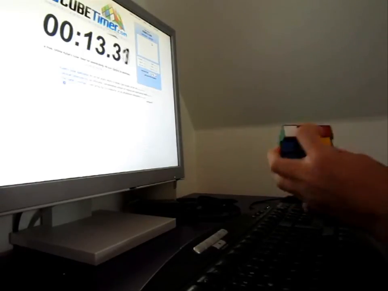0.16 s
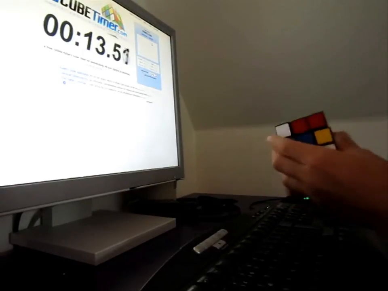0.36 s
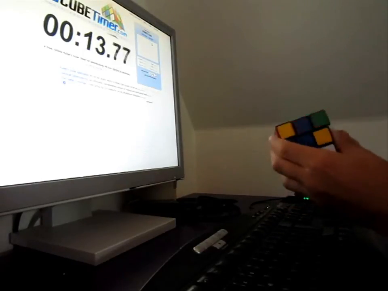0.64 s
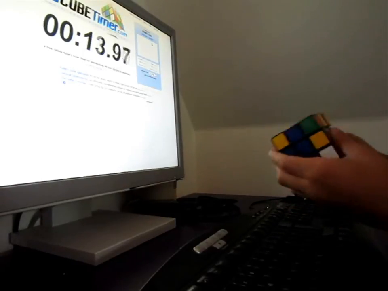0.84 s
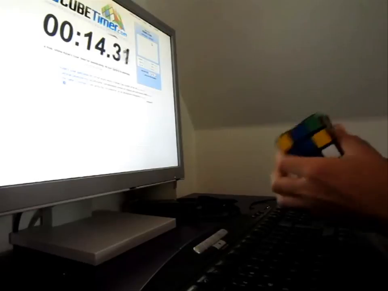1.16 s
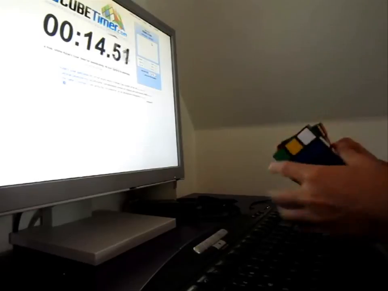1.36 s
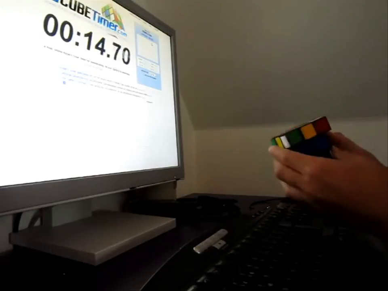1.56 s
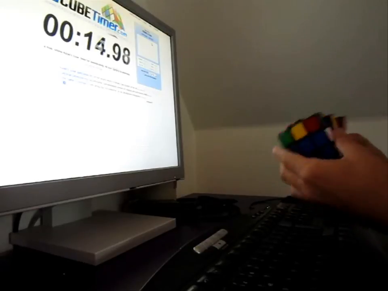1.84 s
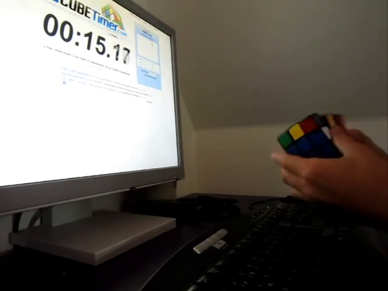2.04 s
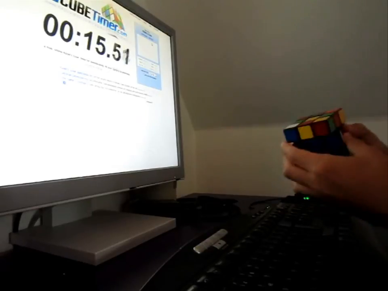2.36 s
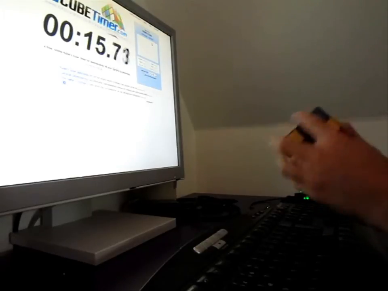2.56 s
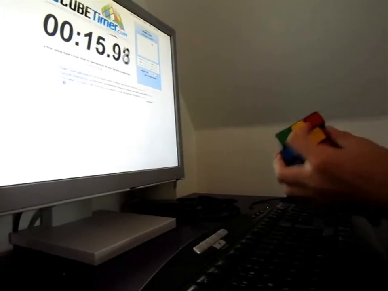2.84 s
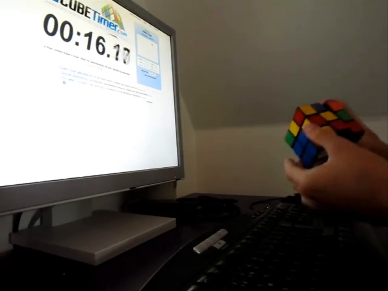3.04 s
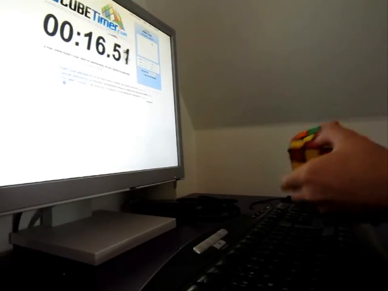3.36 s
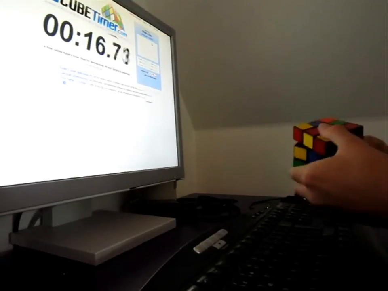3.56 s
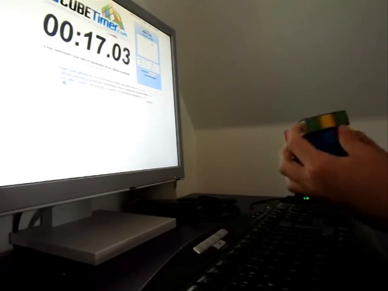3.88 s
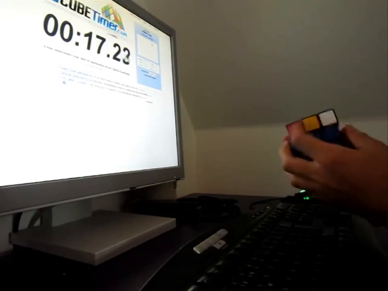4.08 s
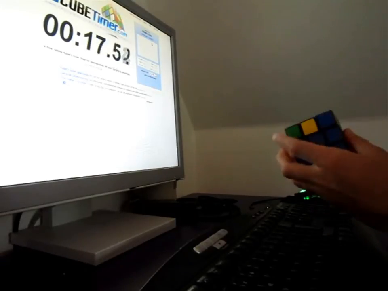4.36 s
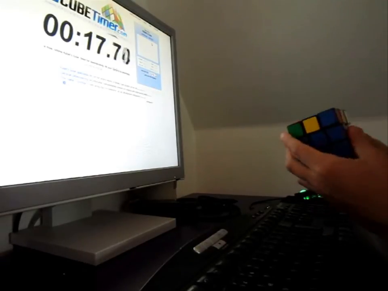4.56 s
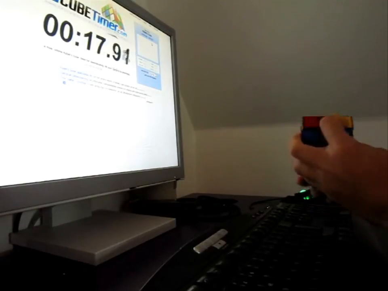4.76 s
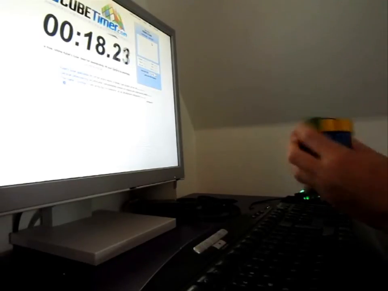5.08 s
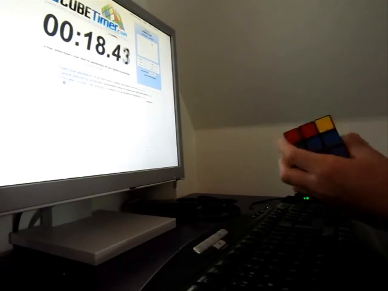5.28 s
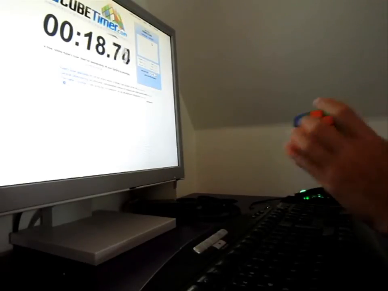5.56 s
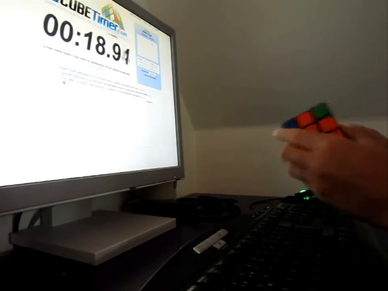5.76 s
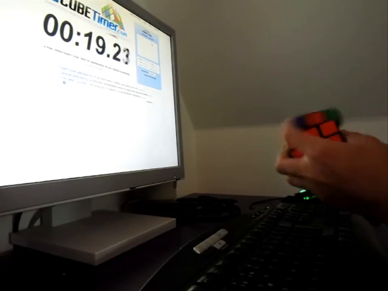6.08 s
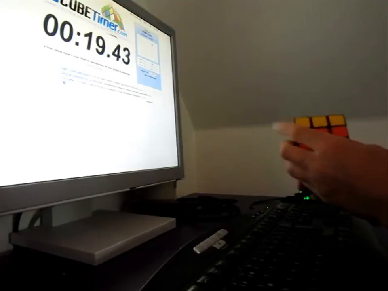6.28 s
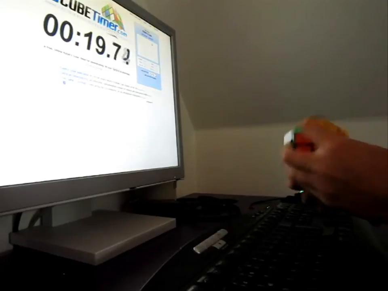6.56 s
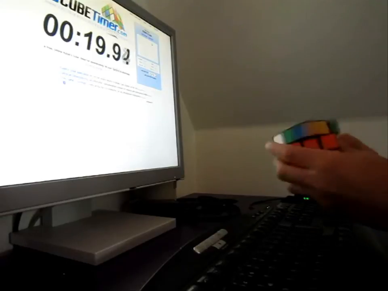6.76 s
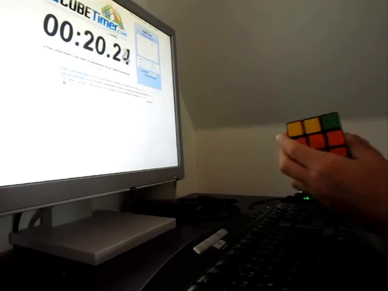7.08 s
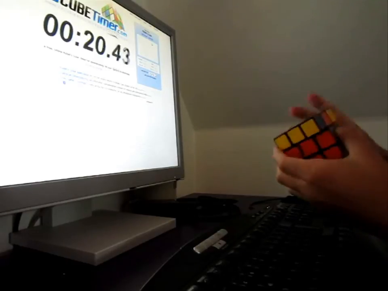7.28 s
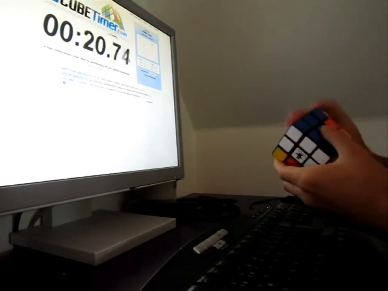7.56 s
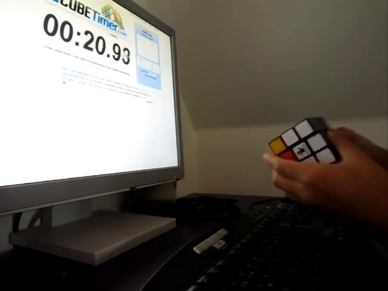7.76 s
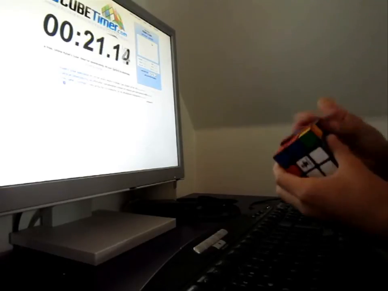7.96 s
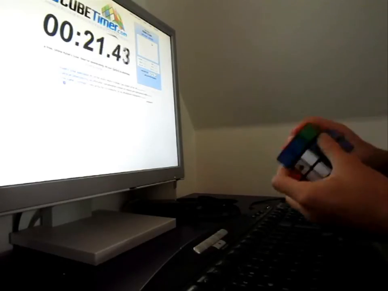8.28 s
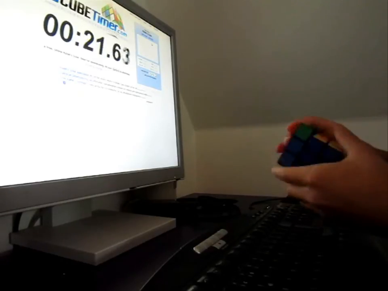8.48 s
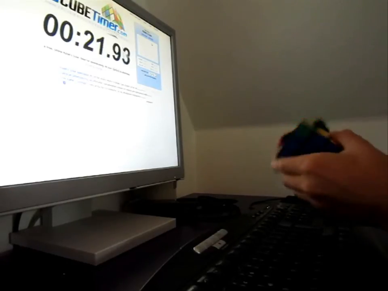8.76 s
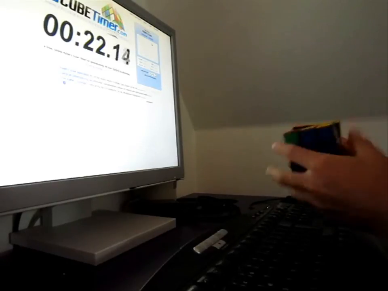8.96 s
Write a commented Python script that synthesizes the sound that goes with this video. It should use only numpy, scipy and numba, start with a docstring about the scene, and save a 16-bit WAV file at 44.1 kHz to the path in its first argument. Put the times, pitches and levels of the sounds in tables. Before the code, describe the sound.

A hollow plastic puzzle cube is turned quickly by hand near the microphone, in a small room with short soft echoes. From 0 to 0.4 seconds comes a dense, loud flurry of clicks, then weaker ticks and scraping until firmer clacks near 1 second. Sparse clicks follow, with a hard snap at 1.6 and a very strong cluster at 2.4. From 2.6 to 3.6 it is mostly light rattling and rubbing; single hard snaps land at about 3.7 and 4.3. A rapid loud run fills 4.8 to 5.5, then a short lull. More bursts come at 5.9, 6.2 and 6.6 to 7, followed by moderate clicking from 7.2, a busy run around 7.9 to 8.4, near quiet, and a last sharp click at 8.95. A faint computer fan hums throughout; occasional dull forearm bumps sound on the desk. Loud runs briefly duck the level.

```python
"""A plastic puzzle cube is turned fast by hand for nine seconds over the faint hum of a computer.
From the start, layers scrape and catch between bright clicks: tiny knocks ring the same shells and core.
Each click is a cluster of loose pieces knocking: thin shells crack as noise, the hollow core clacks in modes.
A small room answers with short diffuse echoes; from half a second on, forearms now and then bump the desk.
Dense loud runs pull the level down for a moment."""
import sys
import numpy as np
from scipy import signal
from scipy.fft import rfft, irfft
from scipy.io import wavfile
from numba import njit

SR = 44100
rng = np.random.default_rng(int(sys.argv[2]) if len(sys.argv) > 2 else 0)


def write(x):
    x = np.atleast_2d(x).T
    wavfile.write(sys.argv[1], SR, np.round(np.clip(x, -1, 1) * 32767).astype(np.int16))


N = 402633
CLICK_SIZE, LEAD_SIZE = 4096, 512  # samples in one click, and those kept ahead of its main blow

# clear clicks, as a layer catches or snaps home:
# [t/s, level/dB, hollow core/dB relative to the click, treble/dB relative to the click]
CLICK_TABLE = [(0.004, -3.5, -21, -21), (0.012, -2.5, -18, -6.5), (0.087, -4.5, -14, -17.5),
               (0.157, -13, -19, -17), (0.181, -3.5, -14.5, -18), (0.196, -5.5, -11, -16),
               (0.218, -2, -22, -16), (0.233, -4.5, -16.5, -12.5), (0.268, -3, -20.5, -18.5),
               (0.351, -14.5, -20, -26), (0.36, -15.5, -15, -17), (0.393, -4.5, -13.5, -16),
               (0.469, -21, -13, -15.5), (0.489, -23, -15, -14.5), (0.613, -15.5, -17.5, -19.5),
               (0.644, -12.5, -11.5, -21.5), (0.727, -21, -14.5, -22), (0.757, -18, -18.5, -21),
               (0.849, -20.5, -17, -17), (0.872, -13, -20, -23), (0.913, -15, -18, -35),
               (0.938, -27, -5, -3), (0.979, -8, -7.5, -15), (1.038, -4.5, -17, -15.5),
               (1.057, -5, -12.5, -15.5), (1.201, -25, -14, -15.5), (1.328, -23, -15, -24),
               (1.344, -15, -13, -21), (1.362, -10, -15.5, -20), (1.594, -11, -12.5, -15),
               (1.613, -4.5, -20.5, -19), (1.724, -23, -14, -21), (1.79, -24.5, -31, -18),
               (1.847, -28.5, -12.5, -23), (1.904, -12.5, -11, -16.5), (1.977, -17.5, -22, -17),
               (2.01, -21, -11, -14), (2.023, -13, -18.5, -20), (2.146, -7, -21.5, -11.5),
               (2.275, -27, -14, -8), (2.321, -16.5, -10, -11), (2.33, -10.5, -18.5, -13),
               (2.424, -2.5, -22, -13), (2.434, 1.5, -17, -14), (2.45, 1, -15, -6), (2.585, -29, -8, -8),
               (2.613, -10.5, -17, -15), (2.731, -32.5, -16, -22), (2.801, -29.5, -15, -12),
               (2.824, -26.5, -15, -27), (2.894, -16, -16.5, -21), (2.913, -10.5, -10, -18),
               (3.022, -11.5, -19, -16), (3.032, -15, -21, -17), (3.101, -25, -27, -25),
               (3.162, -19.5, -48, -16), (3.366, -24.5, -14.5, -18), (3.488, -27.5, -13, -20),
               (3.52, -24.5, -21, -17), (3.542, -21, -18, -19), (3.668, -0.5, -17, -16),
               (3.792, -11, -15, -15), (3.809, -10, -20, -15), (3.88, -21.5, -20, -20),
               (3.92, -21.5, -16.5, -21), (3.968, -12, -18, -22), (3.998, -11.5, -21.5, -22),
               (4.083, -10.5, -21, -21), (4.175, -26, -22, -24), (4.333, -2.5, -21, -17.5),
               (4.417, -25.5, -21, -31), (4.503, -19, -13.5, -18), (4.695, -28.5, -15, -19.5),
               (4.758, -19, -16, -20), (4.772, -14.5, -15, -21), (4.798, -8.5, -13, -22),
               (4.818, -7.5, -15, -16), (4.825, -7.5, -14, -13), (4.839, -1.5, -18, -15),
               (4.881, 0, -14, -13.5), (4.969, -16.5, -17, -26), (5.02, -24, -10.5, -20),
               (5.032, -20.5, -17, -29), (5.076, -8, -12, -19.5), (5.109, -4.5, -15.5, -15),
               (5.174, -9, -18.5, -16), (5.206, -6, -21, -16), (5.221, -2.5, -17.5, -16),
               (5.257, -4, -15, -15.5), (5.329, -13, -17, -25), (5.34, -14, -14.5, -20),
               (5.418, -14.5, -19, -31), (5.439, -20, -16, -17), (5.456, -8, -11.5, -15),
               (5.481, -5, -18.5, -19), (5.65, -35.5, -18, -16), (5.766, -30, -20, -15),
               (5.855, -14.5, -15, -20), (5.883, -12, -14.5, -17.5), (5.915, -7, -17.5, -16),
               (6.026, -12, -16.5, -28.5), (6.168, -18.5, -17, -28), (6.217, -1, -14.5, -20.5),
               (6.246, -7, -14, -13.5), (6.266, -6, -22, -18), (6.27, -8.5, -14.5, -18),
               (6.362, -20.5, -14, -24), (6.429, -24, -13, -25), (6.575, -5, -11, -15.5),
               (6.708, -10, -14, -20), (6.747, -15, -20, -21), (6.819, -11.5, -12.5, -21),
               (6.843, -9.5, -17, -9), (6.876, -7, -12.5, -13), (6.904, -5.5, -17, -18),
               (6.977, -8.5, -13, -14), (7.018, -18.5, -16.5, -20), (7.141, -29, -23, -23),
               (7.209, -18.5, -17, -27), (7.232, -7, -25, -21), (7.254, -8, -19.5, -20),
               (7.413, -32.5, -24, -13), (7.507, -13.5, -17, -25), (7.542, -14.5, -22, -21),
               (7.561, -8.5, -15, -19.5), (7.699, -27.5, -22, -20), (7.726, -18.5, -15, -18),
               (7.761, -18, -16, -15), (7.78, -9, -12.5, -17.5), (7.894, -8.5, -14.5, -19.5),
               (7.944, -9, -15.5, -20), (7.999, -5.5, -22, -9.5), (8.016, -10.5, -17, -19),
               (8.13, -30.5, -9, -14), (8.256, -27.5, -13, -8), (8.288, -10.5, -16, -18),
               (8.305, -17.5, -13.5, -18), (8.321, -7, -22, -22), (8.375, -12.5, -14.5, -13.5),
               (8.413, -13, -13, -22), (8.424, -17, -18, -20), (8.437, -9, -15, -24),
               (8.444, -5.5, -12, -16), (8.621, -33, -13, -17), (8.694, -33, -17, -17.5),
               (8.834, -26, -17.5, -23.5), (8.916, -15.5, -15, -19.5), (8.952, -3, -17.5, -21),
               (9.064, -25.5, -38, -21.5)]
# modes of the hollow cube in the hands: [f/Hz, relative level/dB, t60/s]
CORE_MODES = [(291, -15, 0.021), (448, -2.5, 0.017), (481.3, -4.5, 0.03), (702.4, -15.5, 0.11),
              (788, -11.5, 0.1), (961, 3.5, 0.018), (1081, 3.5, 0.027), (1096, 4, 0.026),
              (1217, -1.5, 0.027), (1379, -23, 0.2)]
# colour of the thin plastic shells: [f/Hz, relative level/dB]
SHELL_COLOUR = [(200, -13), (500, -11), (1100, -5), (1850, -4), (2300, 2.5), (3200, -0.5), (4600, -2),
                (6300, -2.5), (8000, -7.5), (9300, -10), (10400, -7.5), (13000, -14), (15600, -20)]


def undb(db):
    """Decibels to gain."""
    return 10 ** (np.asarray(db) / 20)


def unit(x):
    """Scale each row to energy 1."""
    return x / np.sqrt(np.sum(x ** 2, axis=-1, keepdims=True))


def level(x, db):
    """Scale to an rms level."""
    return x * undb(db) / np.sqrt(np.mean(x ** 2))


def fade(t, t60):
    """Amplitude of a ring that loses 60 dB in t60 seconds."""
    return np.exp(-np.log(1000) * t / t60)


def lowpass(x, order, hz):
    """Zero-phase low-pass, so that x minus the result is the matching treble."""
    return signal.sosfiltfilt(signal.butter(order, hz, fs=SR, output="sos"), x)


def colour(x, points, size=1024):
    """Minimum-phase filter with the given (Hz, dB) outline: no sound ahead of its blow."""
    hz, db = np.transpose(points)
    bins_hz = np.fft.rfftfreq(size, 1 / SR)
    outline_db = np.interp(np.log(bins_hz + 1), np.log(hz), db)
    cepstrum = irfft(np.log(undb(outline_db)))
    # fold the cepstrum forward in time to make the response causal
    cepstrum[1:size // 2] *= 2
    cepstrum[size // 2 + 1:] = 0
    response = irfft(np.exp(rfft(cepstrum)))
    filtered = signal.fftconvolve(np.atleast_2d(x), response[None], axes=1)
    return filtered[:, :x.shape[-1]].reshape(x.shape)


def computer(air_db=-54):
    """Fan and air as coloured noise, with hum lines of narrow-band noise that waver."""
    # computer fan and room air: [f/Hz, relative level/dB]
    air_colour = [(20, 0), (60, 5.5), (110, -5.5), (150, -2), (240, -7), (340, -14), (450, -2), (1000, -11),
                  (1750, -15), (2150, -16), (4500, -49), (9000, -38), (15500, -51)]
    # hum of the computer: [f/Hz, half-width/Hz, rms level/dB]
    hum_lines = [(116.2, 11, -60.5), (181.7, 15.4, -63), (299, 30.4, -54.5)]
    f = np.fft.rfftfreq(N, 1 / SR)
    hum = np.zeros(N)
    for hz, width, db in hum_lines:
        spectrum = rfft(rng.standard_normal(N)) / (1 + ((f - hz) / width) ** 2)
        hum += level(irfft(spectrum, N), db)
    air = level(colour(rng.standard_normal(N), air_colour, size=4096), air_db)
    return hum + air


def rubbing_level():
    """How hard the layers rub between clicks, as a relative gain."""
    # high in fast runs and low while the fingers rest: [t/s, relative level/dB]
    rubbing_points = [(0.0, -44), (0.12, -50), (0.33, -39), (0.46, -58), (0.69, -42.5), (0.91, -49),
                      (1.17, -48.5), (1.93, -47.5), (2.06, -44), (2.34, -56), (2.7, -74), (2.84, -47),
                      (3.02, -37.5), (3.2, -54), (3.41, -49), (3.71, -43.5), (3.94, -39.5), (4.15, -54),
                      (4.75, -56), (4.96, -41.5), (5.34, -39.5), (5.54, -63), (5.77, -53), (6.08, -42),
                      (6.43, -53), (6.64, -45), (6.81, -37), (6.89, -57), (7.02, -65), (7.22, -59),
                      (7.55, -52), (7.73, -48), (7.93, -35), (8.09, -56), (8.75, -57), (9.13, -57)]
    return undb(np.interp(np.arange(N) / SR, *np.transpose(rubbing_points)))


def turning(run_up_s=0.011, firmness=0.69, rubbing_db=30):
    """Sliding effort: it follows the rubbing of the layers and builds up just before each click."""
    s, db = np.transpose(CLICK_TABLE)[:2]
    stops = np.zeros(N)
    stops[np.clip(s * SR, 0, N - 1).astype(int)] = undb(firmness * db) ** 2
    # a decay run backwards in time swells towards each stop; run_up_s is its time constant in power
    keep = np.exp(-1 / (run_up_s * SR))
    run_up = signal.lfilter([1], [1, -keep], stops[::-1])[::-1]
    return np.sqrt(run_up + (undb(rubbing_db) * rubbing_level()) ** 2)


def crackle(blows, t60):
    """Each blow meets another piece, whose crowded modes are heard as a fast-dying burst of noise."""
    decay = fade(np.arange(CLICK_SIZE) / SR, t60) ** 2
    power = signal.fftconvolve(np.atleast_2d(blows ** 2), decay[None], axes=1)
    power = power[:, :blows.shape[-1]].reshape(blows.shape)
    # the convolution can dip just below zero, hence abs
    return np.sqrt(np.abs(power)) * rng.standard_normal(blows.shape)


def plastic(grit, shell_db, core_db):
    """Small knocks sound through coloured shells and ringing core, each at its own rms level."""
    t = np.arange(CLICK_SIZE) / SR
    body = np.zeros(CLICK_SIZE)
    for k, (hz, db, t60) in enumerate(CORE_MODES):
        body += (-1) ** k * undb(db) * np.sin(2 * np.pi * hz * t) * fade(t, t60)
    shell_sound = level(colour(grit, SHELL_COLOUR), shell_db)
    core_sound = level(signal.fftconvolve(grit, body)[:N], core_db)
    return shell_sound + core_sound


def scrape(slips_per_s=300, scatter_db=6, shell_db=-34, core_db=-41, slip_t60=0.027):
    """Sliding faces stick and slip: a dense run of tiny knocks, swelling with the turning effort."""
    happens = rng.random(N) < slips_per_s / SR
    slips = happens * undb(scatter_db * np.clip(rng.standard_normal(N), -2, 2))
    # the levels of plastic() hold before the effort shapes them
    return turning() * plastic(crackle(slips, slip_t60), shell_db, core_db)


def contacts(gap_s=0.0008, settle_s=0.0083, shake=0.083, scatter_db=3, main_blow=1.27,
             lead_s=0.0016, lead_db=-13, count=13, lead_count=4):
    """For each click a few light touches, the main blow, then neighbouring pieces knocking ever more weakly."""
    db = np.array(CLICK_TABLE)[:, 1:2]
    # a hard snap shakes more pieces loose than a light tick
    loose = undb(shake * (db - np.mean(db)))
    gaps = rng.exponential(gap_s, (len(db), count))
    after = np.cumsum(gaps, axis=1) - gaps[:, :1]
    before = rng.exponential(lead_s, (len(db), lead_count))
    knock_force = np.exp(-after / (settle_s * loose))
    touch_force = loose * undb(lead_db) * np.exp(-before / settle_s)
    force = np.hstack([knock_force, touch_force])
    force = force * undb(scatter_db * rng.standard_normal(force.shape))
    force = force * rng.choice([-1, 1], force.shape)  # pushes go either way
    force[:, 0] = main_blow
    place = LEAD_SIZE + np.hstack([after, -before]) * SR
    place = np.clip(place, 0, CLICK_SIZE // 2).astype(int)
    train = np.zeros((len(db), CLICK_SIZE))
    np.add.at(train, (np.arange(len(db))[:, None], place), force)
    return train


def shells(blows, bright_db, snap_t60=0.004, snap_gain=0.65, crack_t60=0.031,
           rattle_t60=0.041, rattle_db=-11, bright_hz=6500):
    """The hardest blows snap, the thin shells crack, and loose pieces buzz a little longer."""
    # squaring makes the hardest blows stand out
    snap = snap_gain * unit(crackle(blows ** 2, snap_t60))
    crack = unit(crackle(blows, crack_t60))
    rattle = undb(rattle_db) * unit(crackle(blows, rattle_t60))
    sound = unit(colour(snap + crack + rattle, SHELL_COLOUR))
    # each click has its own treble lift or cut
    dull = lowpass(sound, 2, bright_hz)
    return dull + (sound - dull) * undb(np.clip(bright_db, -10, 10))


def ring(hz, gain, t60):
    """Spectrum of damped modes, one set (a row of hz and gain) for each click."""
    s = 2j * np.pi * np.fft.rfftfreq(CLICK_SIZE, 1 / SR)
    modes = 0
    for f, g, t in zip(hz.T, gain.T, t60):
        modes = modes + g[:, None] * s / ((s + np.log(1000) / t) ** 2 + (2 * np.pi * f[:, None]) ** 2)
    return modes


def core(blows, grip_detune=0.015, scatter_db=2.5):
    """The hollow body rings lower, mostly from the hardest blows; the grip shifts its modes a little."""
    hz, db, t60 = np.transpose(CORE_MODES)
    shape = (len(CLICK_TABLE), len(CORE_MODES))
    # neighbouring modes swing in opposite directions
    swing = (-1) ** np.arange(len(CORE_MODES))
    gain = undb(db + scatter_db * rng.standard_normal(shape)) * swing
    gripped_hz = hz * (1 + grip_detune * rng.standard_normal(shape))
    hard_blows = blows * np.abs(blows)
    return unit(irfft(rfft(hard_blows) * ring(gripped_hz, gain, t60)))


def clicks(shell_db=12.5, core_db=24, mean_bright_db=2.5):
    """The same contacts drive shells and core; each click has its own share of hollow ring and of treble."""
    s, db, hollow_db, treble_db = np.transpose(CLICK_TABLE)
    bright_db = mean_bright_db + treble_db - np.mean(treble_db)
    blows = contacts()
    shell_sounds = undb(shell_db) * shells(blows, bright_db[:, None])
    core_sounds = undb(core_db + hollow_db[:, None]) * core(blows)
    out = np.zeros(N + 2 * CLICK_SIZE)
    starts = np.clip(s * SR, 0, N).astype(int)
    for start, sound, gain in zip(starts, shell_sounds + core_sounds, undb(db)):
        out[start:start + CLICK_SIZE] += gain * sound
    # drop the lead so that main blows land on their times
    return out[LEAD_SIZE:LEAD_SIZE + N]


def room_response(t60=0.19, treble_t60=0.16, room_db=-9.5, build_s=0.012, split_hz=6000):
    """A short diffuse tail of noise that builds up softly and whose treble dies first."""
    t = np.arange(SR // 3) / SR
    noise = rng.standard_normal(len(t))
    low = lowpass(noise, 2, split_hz)
    tail = low * fade(t, t60) + (noise - low) * fade(t, treble_t60)
    build_up = 1 - np.exp(-(t / build_s) ** 2)
    return undb(room_db) * unit(tail * build_up)


def room(x, count=24):
    """The cube keeps moving in the hands, so its echo paths change from one stretch to the next."""
    out = np.zeros(N + SR)
    for span in np.array_split(np.arange(N), count):
        wet = signal.fftconvolve(x[span], room_response())
        out[span[0]:span[0] + len(wet)] += wet
    return out[:N]


def catches(gap_s=0.026, unevenness=0.54, scatter_db=7.0, catch_t60=0.029,
            shell_db=-55, core_db=-62, count=900):
    """Edges of pieces brush past one another at uneven intervals, harder the more the layers rub."""
    gaps, sizes = rng.standard_normal((count, 2)).T
    times = np.cumsum(gap_s * np.exp(unevenness * gaps))  # gap_s is the median gap
    place = (times * SR).astype(int)
    inside = place < N
    knocks = np.zeros(N)
    knocks[place[inside]] = undb(scatter_db * np.clip(sizes[inside], -2, 2))
    return plastic(crackle(knocks * rubbing_level(), catch_t60), shell_db, core_db)


def bumps(rise_s=0.017, top_hz=75):
    """Dull thuds through the desk: low noise that swells quickly and sinks away."""
    # soft bumps of the forearms on the desk: [t/s, level at the top of the swell/dB]
    bump_table = [(.51, -48), (1.41, -44), (1.53, -48), (1.7, -47), (2.81, -51), (3.17, -48), (3.96, -45),
                  (4.36, -42.5), (6.84, -40), (8.03, -42), (8.61, -44)]
    t = np.arange(N) / SR
    swell = np.zeros(N)
    for s, db in bump_table:
        age = np.maximum(t - s, 0) / rise_s
        swell += undb(db) * age * np.exp(1 - age)
    low_filter = signal.butter(3, top_hz, fs=SR, output="sos")
    rumble = level(signal.sosfilt(low_filter, rng.standard_normal(N)), 0)
    return swell * rumble


def scene(radiation_hz=250, count=3):
    """The cube, too small to radiate bass, in its room over the computer."""
    rubbing = scrape() + catches()
    # each face radiates its own version of a click; one faces the microphone, all reach the walls
    faces = [clicks() + rubbing for _ in range(count)]
    echoes = sum(room(face) for face in faces) / np.sqrt(count)
    bass_cut = signal.butter(3, radiation_hz, "high", fs=SR, output="sos")
    cube = signal.sosfilt(bass_cut, faces[0] + echoes)
    return (cube + computer() + bumps())[None]


@njit
def follow(x, attack, release):
    """Envelope that rises fast and sinks slowly; attack and release are steps per sample."""
    out, e = np.empty(len(x)), 0.
    for i in range(len(x)):
        e += (x[i] - e) * (attack if x[i] > e else release)
        out[i] = e
    return out


def record(dry, threshold_db=-21, depth=1.3, memory_s=0.0076, attack_s=0.026, release_s=0.14, top_hz=15800):
    """Gain control ducks as loudness passes a threshold; peaks are rounded and the top is cut."""
    step = 1 / (memory_s * SR)
    loudness = np.sqrt(signal.lfilter([step], [1, step - 1], dry[0] ** 2))
    over = np.maximum(loudness / undb(threshold_db) - 1, 0)
    excess = follow(over, 1 / (attack_s * SR), 1 / (release_s * SR))
    ducked = dry / (1 + depth * excess)
    top_cut = signal.ellip(10, 0.2, 70, top_hz, fs=SR, output="sos")
    return signal.sosfilt(top_cut, np.tanh(ducked))


dry = scene()
out = record(dry)
write(out)
```